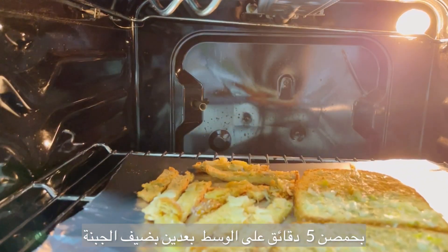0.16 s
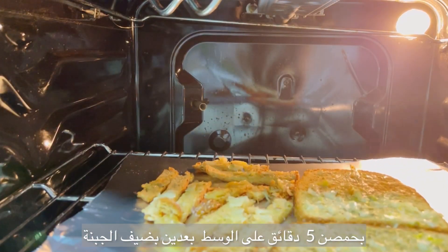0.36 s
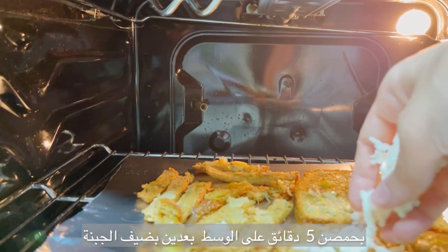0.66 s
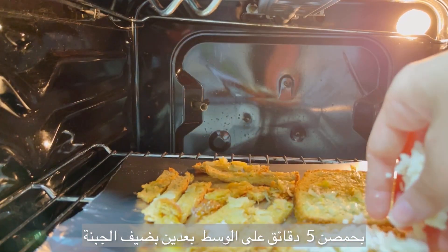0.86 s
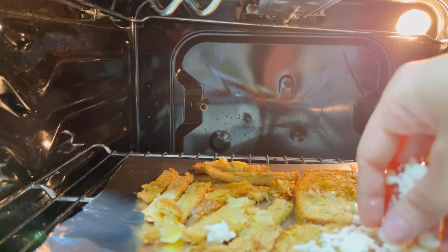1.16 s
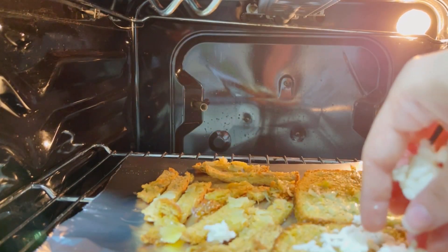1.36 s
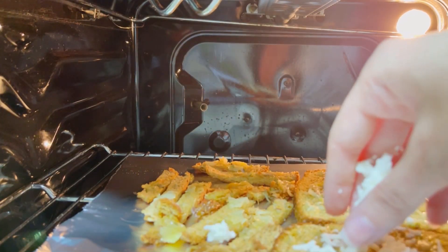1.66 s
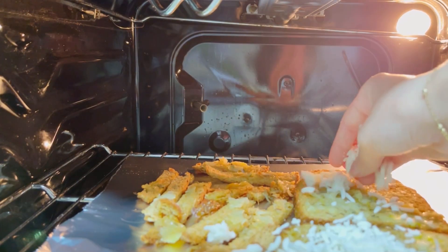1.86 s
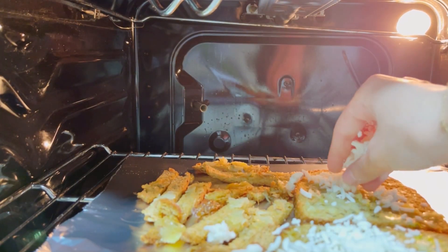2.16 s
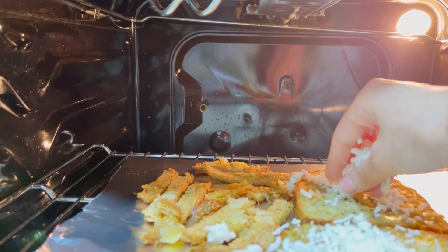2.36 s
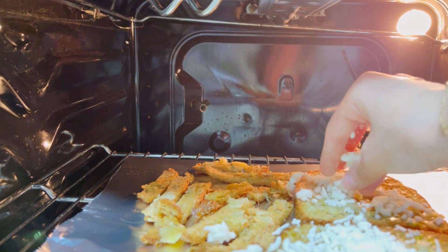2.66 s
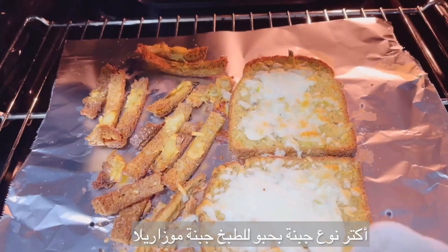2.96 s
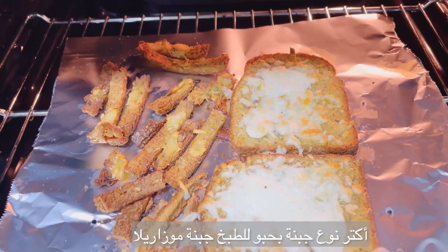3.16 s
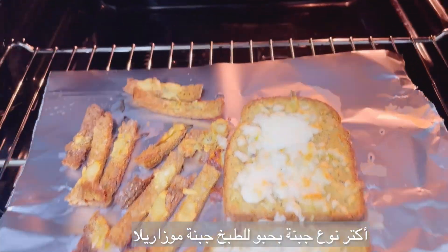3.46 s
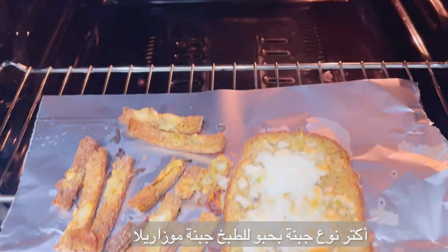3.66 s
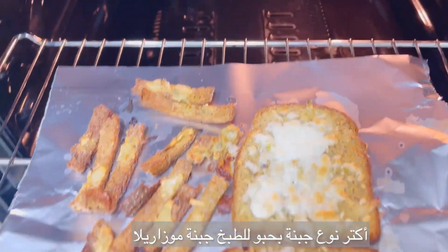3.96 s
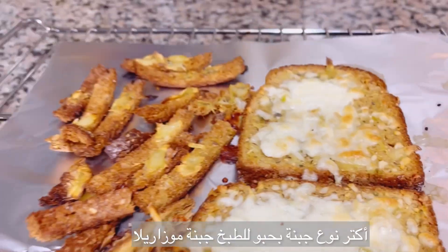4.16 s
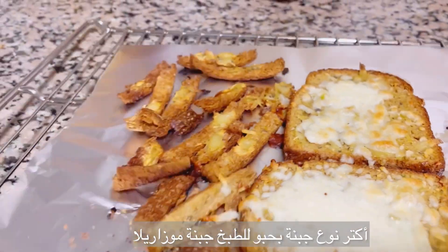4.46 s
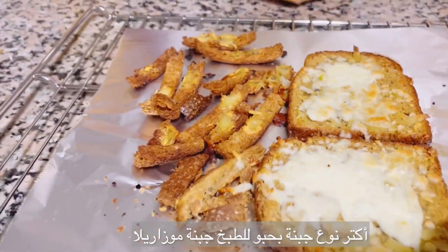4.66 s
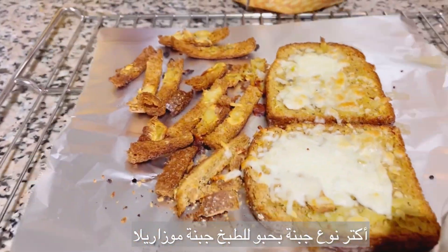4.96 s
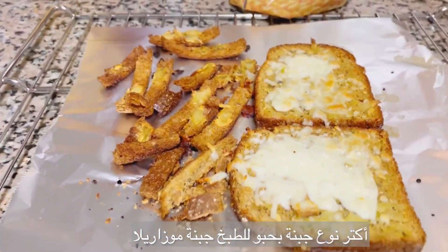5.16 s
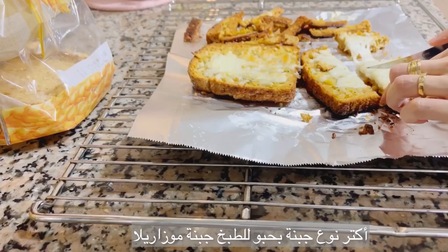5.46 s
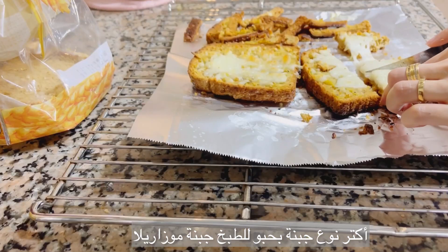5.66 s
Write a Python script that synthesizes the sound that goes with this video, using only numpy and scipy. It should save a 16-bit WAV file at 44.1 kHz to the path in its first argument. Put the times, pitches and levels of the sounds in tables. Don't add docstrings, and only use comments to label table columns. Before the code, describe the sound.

Six abruptly joined moments, recorded in stereo at arm's length. Metal rack clatter opens, falling to low hum and faint crumb ticks. A small tap, then quiet. Rack wires scrape and rattle outward, followed by the loudest sounds, a tray crashing and scraping on stone with bright foil crackle, and finally quick crisp knife rasps.

```python
import sys
import numpy as np
from scipy import signal
from scipy.fft import rfft, irfft, next_fast_len
from scipy.io import wavfile
from scipy.ndimage import uniform_filter1d, map_coordinates

SR = 44100
rng = np.random.default_rng(int(sys.argv[2]) if len(sys.argv) > 2 else 0)


def wrap_up_sound(samples):
    columns = np.atleast_2d(samples).T
    tamed = np.clip(columns, -1, 1)
    steps = np.round(tamed * 32767).astype(np.int16)
    wavfile.write(sys.argv[1], SR, steps)


def to_linear_factor(level_db):
    exponent = np.asarray(level_db, float) / 20
    return 10 ** exponent


N = 255780
HZ = np.fft.rfftfreq(next_fast_len(N + 8192), 1 / SR)

# start t/s, end t/s
SHOTS = [
    (0, .594),
    (.6, 1.77),
    (1.776, 2.868),
    (2.872, 4.011),
    (4.016, 5.39),
    (5.396, 5.8),
]


def unit(x):
    return x / np.sqrt(np.mean(x ** 2) + 1e-20)


def along(points):
    f, v = np.transpose(points)
    return np.interp(np.log(HZ + 1), np.log(f + 1), v)


def curves(rows):
    s, *cols = np.transpose(rows)
    return np.array([np.interp(np.arange(N) / SR, s, c) for c in cols])


def wobble(rate):
    return map_coordinates(rng.standard_normal(int(N * rate / SR) + 4), [np.arange(N) * rate / SR])


def filtered(x, response):
    m = next_fast_len(N + 8192)
    return irfft(rfft(x, m) * response, m)[..., :N]


def shot_at(s):
    return np.minimum(np.searchsorted([end for _, end in SHOTS], s, side="right"), len(SHOTS) - 1)


def rack():
    # f/Hz, level/dB (the foil's is per Hz)
    foil_colour = [(3300, -21.5), (4600, -16), (6500, -10.5), (7800, -6), (9000, -4), (11000, 0.5),
                   (11900, -10), (12500, -13.5), (13150, -25.5), (13350, -120)]
    edge_colour = [(1000, -48.5), (1700, -8), (2400, -7), (4200, -6), (6000, -12.5), (11000, -120)]
    sheet_colour = [(250, -8), (450, -3), (1000, -2), (1500, -3), (2500, -6.5), (3150, -13), (3700, -18.5),
                    (8000, -120)]
    wall_colour = [(40, -16), (95, 0.5), (160, -2.5), (250, 1), (430, -9), (650, -12.5), (2000, -120)]
    # f/Hz, width/Hz, level/dB
    wire_modes = [(7940, 30, -6), (8065, 30, -4), (8300, 36, -5), (8597, 40, -5), (8872, 30, -4),
                  (9220, 30, -5), (9770, 30, -5), (10830, 30, -4), (10990, 25, -4), (11340, 32, -5),
                  (11755, 35, -5), (11935, 35, -6)]
    rim_modes = [(1580, 30, 9.5), (1990, 29, 2), (2290, 12, -9.5), (2555, 35, 1), (3137, 150, -13),
                 (3740, 60, -3), (3933, 15, -14)]
    tray_modes = [(527, 7.1, -4), (646, 5.6, -16), (788, 5.2, -1), (869, 24, 4.5), (950, 22, -7),
                  (1055, 28, 4.5), (1250, 9.3, -2.5)]
    body_modes = [(113.3, 6.1, -4), (241.2, 7.6, 0.5)]
    # foil level/dB, edge level/dB, middle level/dB, body level/dB
    air_levels = [(-69.5, -77, -60.5, -53.5), (-69, -77, -61.5, -58.5), (-72.5, -83, -61.5, -59),
                  (-88.5, -83, -63, -58), (-85.5, -92, -64, -62.5), (-68, -77, -65.5, -67.5)]
    foil, edge, tray, body = forces()
    air = to_linear_factor(np.array(air_levels)[shot_at(np.arange(N) / SR)].T)
    foil_part = metal(foil_colour, wire_modes, ring_db=2.5)
    edge_part = metal(edge_colour, rim_modes, ring_db=1.5)
    tray_part = metal(sheet_colour, tray_modes, ring_db=4)
    body_part = metal(wall_colour, body_modes, ring_db=6)
    return (shaken(foil, air[0], foil_part, grit_db=1.3, grit_rate=500, patchy_db=1.5)
            + sparkle(foil)
            + shaken(edge, air[1], edge_part, grit_db=1.8, grit_rate=200, patchy_db=2)
            + shaken(tray, air[2], tray_part, grit_db=1.5, grit_rate=90, patchy_db=2.2)
            + shaken(body, air[3], body_part, grit_db=1.1, grit_rate=30, patchy_db=1.2)
            + pings())


def forces():
    # t/s, foil level/dB, weight/dB (tray middle over foil)
    drag = [(0, -37, 1.5), (.194, -51.5, 2), (.36, -53, 3), (.42, -71, 10.5), (.6, -82, -9),
            (2.99, -75.5, 7), (3.057, -55.5, 6.5), (3.193, -57, 3), (3.531, -53.5, 6.5), (3.755, -70, 6.5),
            (4.011, -101, 4.5), (4.192, -80, 15.5), (4.414, -43.5, -0.5), (4.524, -48, -4), (5.03, -56, 0),
            (5.17, -56.5, -4), (5.278, -30, -17.5), (5.4, -50.5, -10.5), (5.8, -56.5, -19.5)]
    # t/s, peak level/dB, weight/dB, t60/s, thud/dB over the usual body share
    knocks = [(.0174, -23.5, 6, 0.2, -2), (.1314, -34, 5.5, 0.13, 1), (.2685, -38.5, 7.5, 0.091, 4.5),
              (.2427, -19.5, -18, 0.061, -12), (.7816, -40.5, -2, 0.045, -10),
              (1.8074, -48.5, -4, 0.2, -13), (3.0179, -14, -21, 0.14, 1), (3.4456, -50, 11, 0.16, 7),
              (4.131, -52.5, 3, 0.15, 18.5), (4.192, -51, 3, 0.13, -5), (4.2203, -37, -14, 0.11, 20),
              (4.2595, -37.5, -4, 0.14, -4), (4.2863, -10.5, -10, 0.14, 13),
              (4.4229, -16, -21.5, 0.22, 20.5), (4.938, -19.5, -26, 0.13, 0),
              (4.9824, -28.5, -10.5, 0.25, -3), (5.2316, -13, -22.5, 0.2, -7),
              (5.7065, -28, -18, 0.061, -6)]
    # t/s, peak level/dB, weight/dB, t60/s
    rail_scrapes = [(.0014, -32, 13, 0.12), (.0394, -19.5, -4, 0.16), (.063, -18, -31, 0.19),
                    (.161, -52, -6, .13), (.2707, -21, -11, 0.2), (.3155, -22, -5, 0.16),
                    (.3494, -35, -2.5, 0.16), (3.0072, -21, -3.5, 0.14), (3.0344, -26, -19, 0.12),
                    (3.0614, -24.5, -10, 0.14), (3.0835, -23.5, -9.5, 0.097), (3.27, -49.5, 1, 0.59),
                    (3.3363, -35.5, -2, 0.13), (3.4894, -38, 7, 0.12), (3.432, -44, 7, .2),
                    (3.47, -45, 5, .2), (3.5094, -43.5, 2, 0.16), (3.545, -48, 3, .2),
                    (3.6194, -48, 7.5, 0.68), (3.9469, -52.5, 3, 0.31)]
    # t/s, peak level/dB, weight/dB, t60/s
    counter_scrapes = [(4.3074, -17, -27, 0.75), (4.354, -11.5, -4, 0.079), (4.449, -16, -13.5, 0.2),
                       (4.51, -23.5, -20, 0.29), (4.721, -22, -10.5, 0.17), (4.7394, -24.5, -8.5, .23),
                       (4.762, -22, -15, 0.36), (4.7944, -27.5, -17, 0.16), (4.9447, -17.5, -13, 0.18),
                       (5.0794, -39, -26, 0.12), (5.1805, -22, -20, .1), (5.186, -10.5, -26, 0.17),
                       (5.2044, -10, -25, 0.094), (5.2456, -18, -13, 0.2), (5.508, -30.5, -21, 0.2),
                       (5.762, -37.5, -5, .2)]
    # t/s, peak level/dB, weight/dB, t60/s
    ticks = [(.7785, -44.5, 0, 0.051), (.8025, -45.5, -6.5, .04), (.8644, -56, 3, .03),
             (.9427, -57, 3, .03), (.9761, -49.5, -2.5, 0.058), (1.115, -48.5, -13, .03),
             (1.168, -45.5, -37, 0.032), (1.548, -51, -24, .03), (1.673, -58.5, 6, 0.096),
             (1.8625, -51, -16, 0.042), (2.728, -57.5, -3, 0.036), (2.8287, -62, -15, .03),
             (3.2072, -33, -19, .051), (3.3376, -42.5, 0.5, 0.028), (3.423, -44, -5, .036),
             (3.5673, -39.5, -5, 0.22), (5.0324, -38.5, 2, .019), (5.049, -42, -3, .02),
             (4.2868, -10, -26, 0.028), (4.2945, -13.5, -18, .02), (4.311, -16, -30, .02),
             (3.0185, -22, -31, 0.026), (5.2115, -28, -24, .04), (5.2455, -18.5, -15, .015),
             (5.0675, -21, -35, 0.0063), (5.135, -31, -9, 0.0069), (5.1752, -32, -10, 0.029),
             (5.2322, -10, -29, .012), (4.2405, -55, -3, .03), (.0465, -34, 6, .03), (.2808, -28, -10, .04),
             (.3222, -28.5, -7.5, .04), (5.1912, -26, -30, .03)]
    # t/s, peak level/dB, t60/s
    sawing = [(5.4175, -34, 0.045), (5.445, -30.5, 0.057), (5.4505, -33.5, 0.05), (5.476, -31, 0.027),
              (5.4808, -36, 0.066), (5.5088, -31.5, 0.087), (5.5233, -33, .03), (5.528, -37, 0.043),
              (5.547, -33.5, .03), (5.551, -32.5, 0.062), (5.566, -33, 0.092), (5.5842, -35.5, 0.048),
              (5.6026, -37, 0.04), (5.6274, -43, .024), (5.651, -41, 0.024), (5.674, -33, 0.032),
              (5.7925, -32.5, 0.036)]
    heavy_lag = [0.00011, 0.0028, 0, 0.0066]

    clock = np.arange(N) / SR
    drag_db, weight_db = curves(drag)
    power = to_linear_factor(drag_db + shares(clock, weight_db)) ** 2
    sprinkling = (clock > .79) & (clock < 1.77)
    power[0] += to_linear_factor(-64.5) ** 2 * sprinkling

    t = np.arange(SR // 2) / SR
    longer = np.array([[1.01], [.95], [1.05], [1.2]])
    lag = np.array(heavy_lag)[:, None]
    knife_weight_db = -27
    teeth = [(s, db, knife_weight_db, t60) for s, db, t60 in sawing]
    # contacts, rise in s, size of the first snap
    kinds = [(knocks, .0005, 1.2), ([*rail_scrapes, *counter_scrapes], .012, .01),
             (ticks, .0003, 2.2), (teeth, .0005, 2.6)]
    for contacts, rise, snap_size in kinds:
        for s, db, weight_db, t60, *thud_db in contacts:
            decay = to_linear_factor(-60 * t / (np.clip(t60, .008, .6) * longer))
            rattle = decay * (1 - np.exp(-t / (rise + lag)))
            snap = snap_size * to_linear_factor(-60 * t / .005)
            peak = to_linear_factor(db + shares(s, weight_db, *thud_db)[:, None] - 6.5)
            shot_end = SHOTS[shot_at(s)][1]
            span = power[:, round(s * SR):round(shot_end * SR)][:, :len(t)]
            span += (peak * (rattle + snap))[:, :span.shape[1]] ** 2
    return np.sqrt(power)


def shares(s, weight_db, thud_db=0):
    # tray edge level/dB, edge growth/(dB per dB of weight), body level/dB over tray middle
    coupling = [(-2, 0.82, 1), (2, 0.5, 4.5), (-2, -0.1, 3.5), (-2, 0.27, 0.5), (0.5, 0.43, -15),
                (0, 0.56, -13)]
    edge_db, edge_grows, body_db = np.array(coupling)[shot_at(s)].T
    return np.array([0 * weight_db, edge_db + edge_grows * weight_db, weight_db, weight_db + body_db + thud_db])


def metal(spectrum, modes, ring_db):
    ring = 0
    for k, (centre, width_hz, db) in enumerate(modes):
        damping = 1j * HZ * width_hz
        ring = ring + (-1) ** k * to_linear_factor(db) * damping / (centre * centre - HZ * HZ + damping + 1)
    response = 1 + to_linear_factor(ring_db) * ring
    return unit(np.abs(to_linear_factor(along(spectrum)) * response)), np.angle(response)


def shaken(force, air, part, grit_db, grit_rate, patchy_db):
    grit = unit(to_linear_factor(grit_db * wobble(grit_rate)))
    size, turn = part
    rubbed = force * grit * patchy(patchy_db)
    stirred = air * rng.standard_normal((2, N))
    return filtered(rubbed + stirred, size * np.exp(1j * turn))


def patchy(depth_db):
    z = signal.stft(rng.standard_normal((2, N)), nperseg=1024)[2]
    field = uniform_filter1d(rng.standard_normal(z.shape[1:]), size=3, axis=0)
    field = uniform_filter1d(field, size=4, axis=1)
    return unit(signal.istft(z * to_linear_factor(depth_db * unit(field)), nperseg=1024)[1][:, :N])


def sparkle(foil):
    # t/s, length/s, lowest f/Hz, level/dB under the foil
    open_top = [(0, .004, 13000, -18), (.16, .025, 14200, -20), (.24, 0.015, 13600, -24),
                (3.014, .048, 14000, -23), (4.258, .005, 13000, -16), (4.2845, .016, 13200, -22),
                (4.43, .065, 14600, -29), (4.712, .03, 14400, -28), (4.935, .039, 14400, -27),
                (5.062, .012, 13000, -21), (5.133, .005, 13000, -20), (5.174, .004, 13000, -27),
                (5.196, .034, 15000, -30), (5.437, .122, 13400, -20), (5.615, .03, 14200, -15),
                (5.649, .004, 13000, -14), (5.672, .005, 13000, -19), (5.713, .035, 14400, -18),
                (5.783, .017, 13200, -18)]
    out = np.zeros((2, N))
    hz = np.fft.rfftfreq(8192, 1 / SR)
    for s, length, from_hz, db in open_top:
        span = out[:, round(s * SR):][:, :round(length * SR)]
        band = irfft(rfft(rng.standard_normal((2, 8192))) * ((hz > from_hz) & (hz < 15900)))
        span += to_linear_factor(db) * unit(band)[:, :span.shape[1]] * signal.windows.tukey(span.shape[1], .3)
    return out * uniform_filter1d(foil, size=100)


def pings():
    # t/s, peak level/dB, f/Hz, t60/s
    single_modes = [(.001, -34, 103.6, .6), (.006, -17.5, 231.3, 0.13), (.036, -21.5, 240, 0.11),
                    (0.041, -22, 115, 0.17), (.272, -33.5, 328, 0.075), (0.311, -41, 262, .2),
                    (.365, -34, 256, 0.095), (3.163, -27, 245, 0.069), (3.288, -33, 112, 0.11),
                    (3.451, -31, 124, 0.075), (4.292, -28, 110, 0.078), (4.295, -33.5, 181, 0.074),
                    (3.229, -34, 248, 0.075), (0.018, -30, 137, 0.12), (1.809, -43.5, 1820, 0.062),
                    (1.81, -43.5, 1250, 0.054), (3.022, -34, 170, 0.12), (4.291, -31, 494, 0.059),
                    (.008, -28, 200, .1), (3.015, -37, 1527, .06), (5.1355, -11, 1760, 0.0023),
                    (5.1349, -26, 2860, .004), (5.1349, -31, 4600, .003)]
    # t/s, peak level/dB, f/Hz, t60/s
    clanks = [(.002, -23.5, 1032, .08), (.017, -30, 1090, .15), (.02, -35, 1880, .06),
              (.02, -28, 2330, .08), (.03, -28, 936, 0.12), (.043, -32, 1650, 0.079),
              (.133, -37, 1103, 0.13), (.137, -37, 870, 0.25), (.271, -35.5, 870, 0.15),
              (.272, -44, 1100, .08), (.322, -42, 1050, 0.12), (.335, -41.5, 830, 0.26),
              (.78, -50, 1465, .04), (.78, -54, 1640, .04), (1.809, -45.5, 1080, 0.028),
              (1.809, -49.5, 2590, .04), (1.809, -60, 2840, .04), (1.8625, -60, 2470, .04),
              (3.018, -30.5, 587, 0.034), (3.025, -38, 893, 0.072), (3.325, -44, 1990, 0.18),
              (3.443, -43, 464, 0.13), (3.445, -42.5, 808, 0.22), (3.447, -45, 1070, .1),
              (3.485, -42, 1223, 0.41), (3.506, -43, 2180, .1), (3.508, -44, 833, 0.21),
              (3.524, -39.5, 1725, 0.13), (4.131, -43, 783, .022), (4.192, -42, 820, 0.023),
              (4.192, -46, 1750, .015), (4.192, -51, 3000, .015), (4.225, -54, 2200, .02),
              (4.239, -44, 716, .025), (4.239, -55, 2400, .015), (4.261, -52, 1200, .035),
              (4.287, -26.5, 2280, 0.083), (4.288, -22.5, 1783, .05), (4.289, -25.5, 713, 0.057),
              (4.288, -32, 1094, 0.071), (4.769, -41, 950, 0.19), (4.979, -39, 950, 0.055),
              (5.234, -35.5, 950, 0.23), (5.234, -41, 477, 0.26)]
    out, t = np.zeros(N + SR), np.arange(SR // 3) / SR
    bunch = np.array([-1, 0, 1]) + rng.uniform(-.4, .4, (len(clanks), 3))
    tones = list(single_modes)
    for (s, db, hz, t60), offsets in zip(clanks, bunch):
        tones += [(s, db - 4, hz * (1 + .035 * k), t60) for k in offsets]
    for s, db, hz, t60 in tones:
        swell = 1 - np.exp(-t * hz)
        out[round(s * SR):][:len(t)] += to_linear_factor(db - 60 * t / t60) * swell * np.sin(2 * np.pi * hz * t)
    return out[:N] * to_linear_factor(2 * wobble(45)) * [[1], [.15]]


def drones():
    wall_tones = [(0.35, 0.59, 310, -53.5), (1.952, 2.86, 958, -68.5), (1.8, 2.6, 1085, -73),
                  (2.2, 2.3, 1630, -74), (2.54, 2.72, 1630, -68), (2.62, 2.86, 460, -65.5),
                  (.6, 1.06, 260, -64.5), (2.875, 2.99, 180, -53), (3.55, 4.011, 250, -57.5)]
    t = np.arange(N) / SR
    waver = np.cumsum(wobble(14)) / SR
    total = np.zeros(N)
    for start, end, hz, db in wall_tones:
        gate = uniform_filter1d(1. * ((t > start) & (t < end)), size=1500)
        total += to_linear_factor(db + 1.6 * wobble(12)) * gate * np.sin(2 * np.pi * hz * (t + 0.00797 * waver))
    return total * [[1], [.3]]


def oven():
    # t/s, hum level/dB, rumble level/dB
    background = [(0.0, -25.5, -56), (0.29, -55.5, -56.5), (1.13, -51.5, -62), (1.34, -48.5, -59),
                  (1.76, -55, -59), (2.08, -52.5, -59), (2.41, -50.5, -61), (2.84, -59, -61),
                  (3.31, -62, -65.5), (3.68, -85, -64.5), (5.8, -69, -59.5)]
    # multiple, level/dB
    hum_orders = [(1, -0.5), (2, -16), (3, -13.5)]
    # f/Hz, level/dB
    rumble_colour = [(12, -44), (30, -18), (60, 4.5), (85, -4), (130, -9), (170, -85), (400, -120)]
    hum_db, rumble_db = curves(background)
    phase = 2 * np.pi * np.cumsum(99.6 + 0.844 * wobble(4.33)) / SR
    hum = sum(to_linear_factor(db + 3 * wobble(7)) * np.sin(k * phase) for k, db in hum_orders)
    rumble = unit(filtered(rng.standard_normal((2, N)), to_linear_factor(along(rumble_colour))))
    return to_linear_factor(hum_db + 2.0) * hum * [[1], [0]] + to_linear_factor(rumble_db + 3.5) * rumble


def joins():
    t = np.arange(N) / SR
    inside = sum((t >= a) & (t < b) for a, b in SHOTS)
    return uniform_filter1d(0.15 + 0.75 * inside, size=90)


def scene():
    return (rack() + oven() + drones()) * joins()


def starved(x, from_hz, under_db):
    hz, _, z = signal.stft(np.array([x[0] + x[1], x[0] - x[1]]) / 2, SR, nperseg=1024)
    hz = hz[:, None]
    both, apart = uniform_filter1d(np.abs(z), size=7, axis=1)
    budget_db = under_db + 3.5 * np.repeat(rng.standard_normal(z.shape[2]), 3)[:z.shape[2]]
    kept = (hz < from_hz) | (both + apart > to_linear_factor(budget_db - 8 * (hz > 13400)))
    cancelled = (np.abs(hz - 10200) < 250) & (both < to_linear_factor(-17) * apart)
    masks = np.array([~cancelled, np.ones_like(cancelled)])
    mid, side = signal.istft(z * kept * masks, SR, nperseg=1024)[1][:, :N]
    return np.array([mid + side, mid - side])


def roll_off(x):
    return signal.sosfilt(signal.butter(12, 16880, fs=SR, output="sos"), x)


def record(dry):
    # f/Hz, likeness 0..1
    alike = [(40, .985), (90, .99), (150, .94), (300, .94), (640, .72), (1200, .6), (2100, .52),
             (3500, .68), (5500, .6), (7300, .66), (7900, .985), (11500, .985), (12500, .9), (16000, .9)]
    # f/Hz, level/dB
    left_over_right = [(60, 0), (700, 1.2), (1300, 0), (2000, 2), (3000, 4), (7200, 4.5), (8200, .3),
                       (16000, 0)]
    # f/Hz, phase/rad
    left_lead = [(0, 0), (400, .2), (2000, -.2), (2900, .9), (6400, .2), (7600, 1.1), (8550, 0),
                 (10200, -3.14), (12050, -6.28), (12450, -6.6), (13000, -9.4), (14300, -9.4),
                 (15000, -12.4)]
    turn = np.arccos(np.clip(along(alike), 0, 1)) / 2
    shared, apart = filtered(dry, np.array([np.cos(turn), np.sin(turn)]))
    skew = to_linear_factor(along(left_over_right) / 2) * np.exp(.5j * np.interp(HZ, *np.transpose(left_lead)))
    ports = filtered(np.array([shared + apart, shared - apart]), np.array([skew, 1 / skew]))
    ports = ports / (1 + np.abs(ports / .7) ** 4) ** .25
    thinned = starved(ports, from_hz=11760, under_db=-82)
    return roll_off(thinned)


dry = scene()
out = record(dry)
wrap_up_sound(out)
```